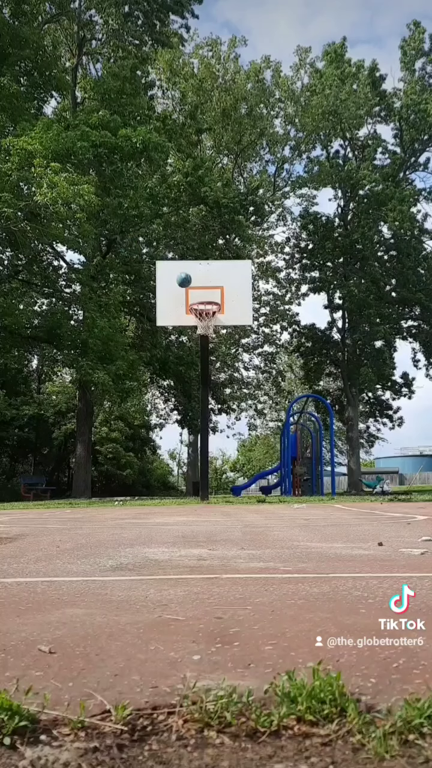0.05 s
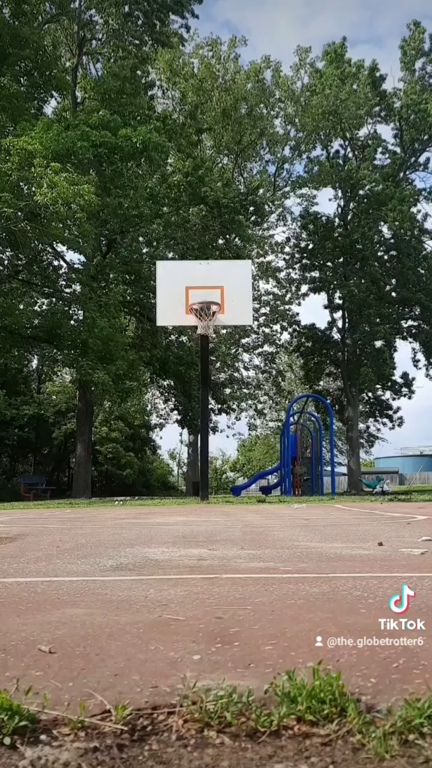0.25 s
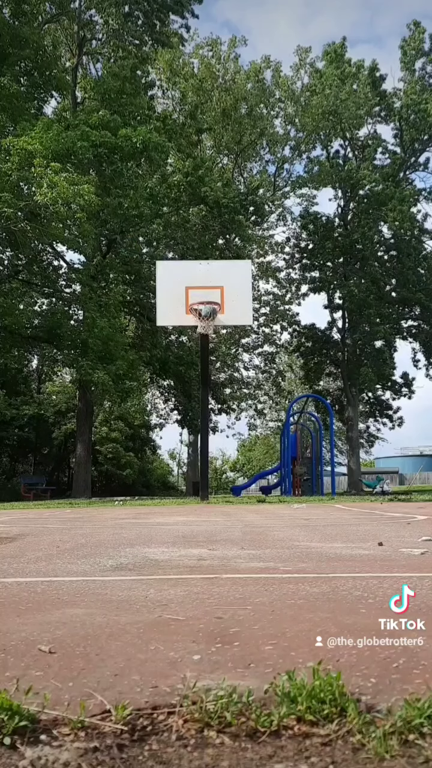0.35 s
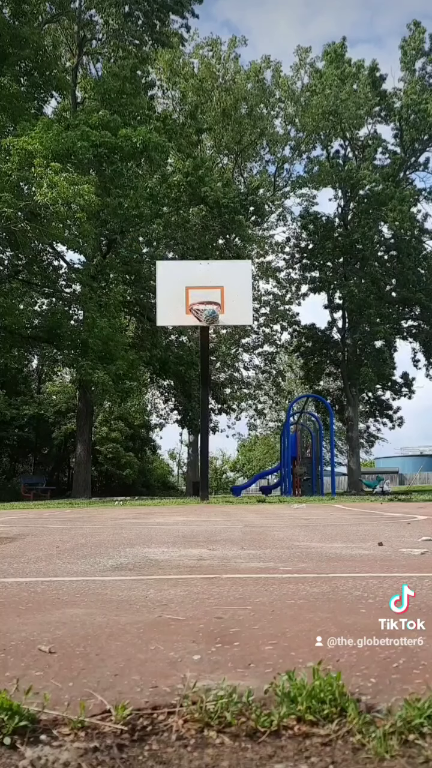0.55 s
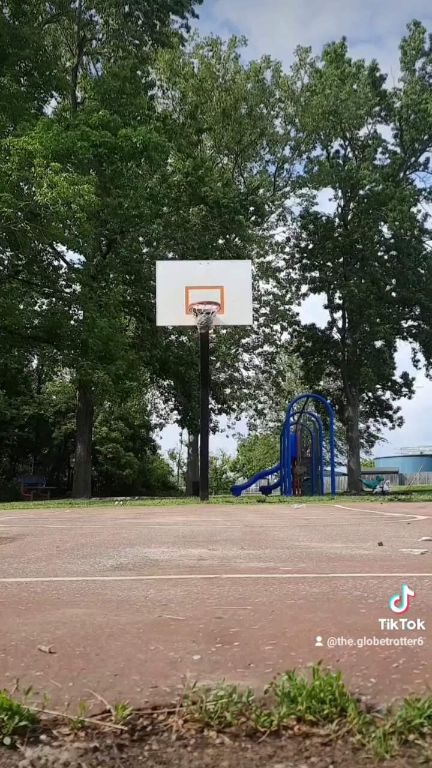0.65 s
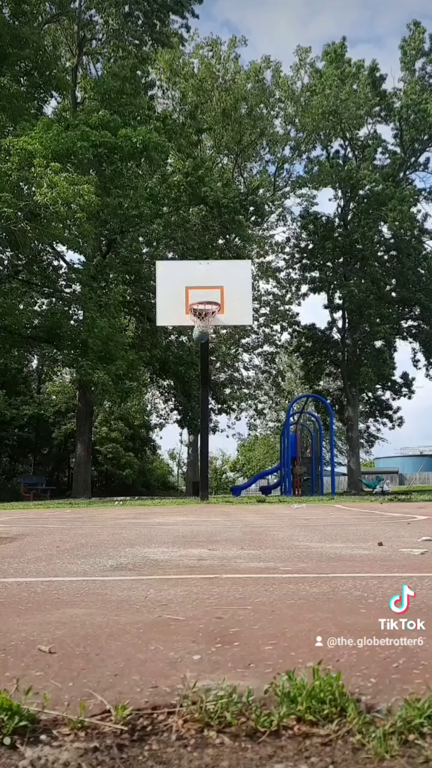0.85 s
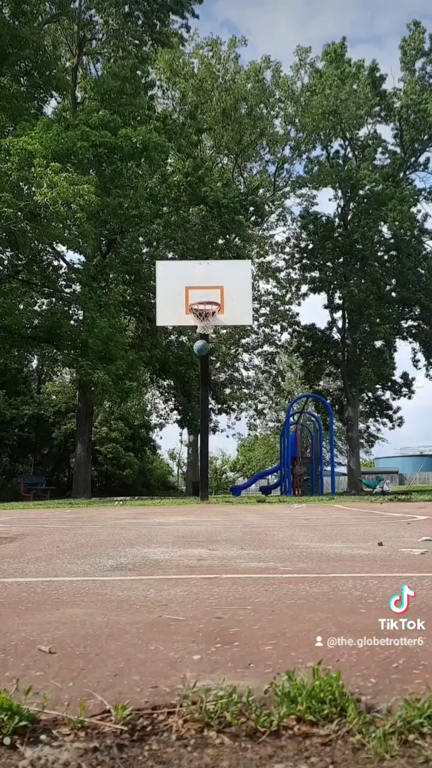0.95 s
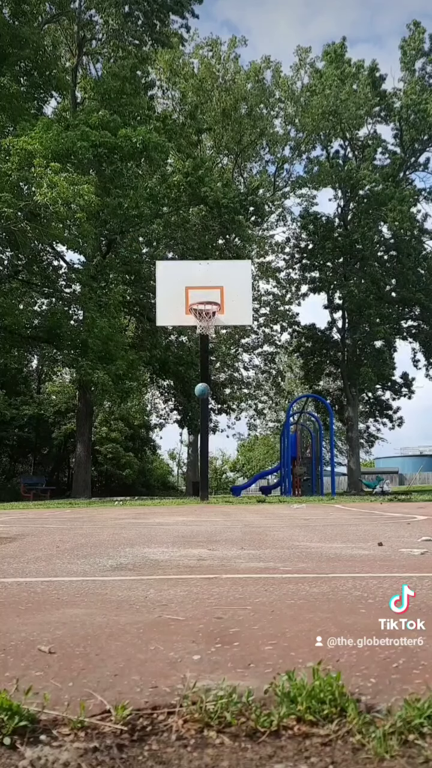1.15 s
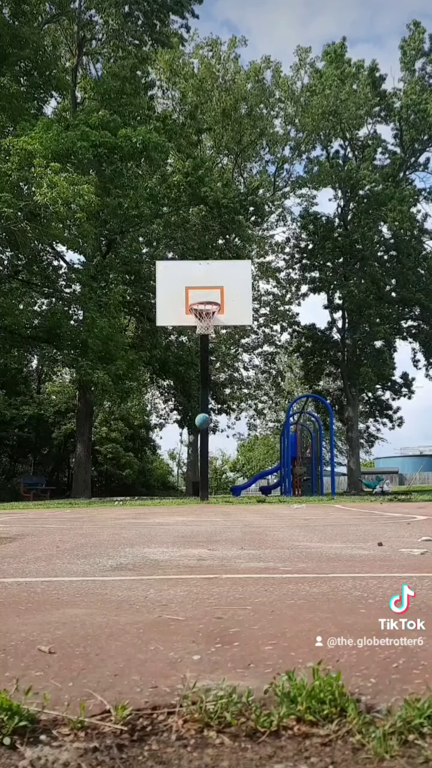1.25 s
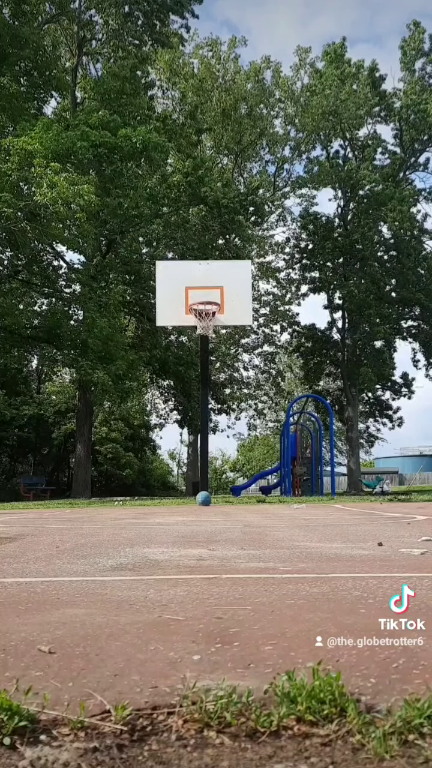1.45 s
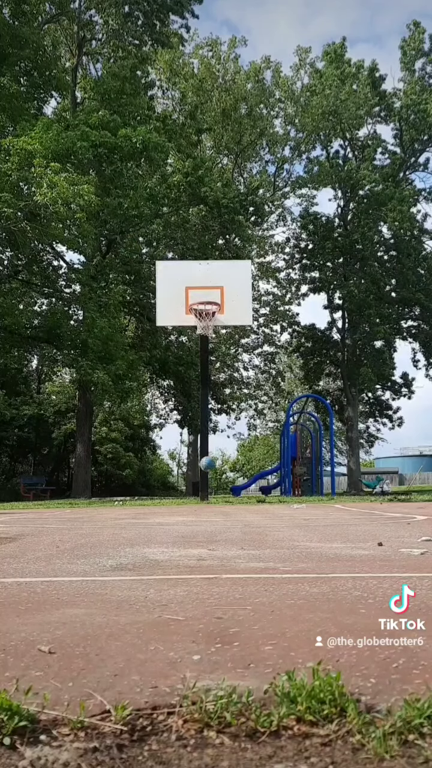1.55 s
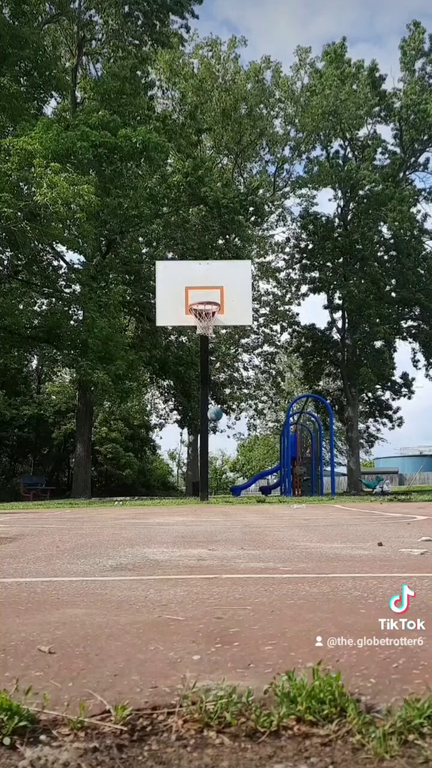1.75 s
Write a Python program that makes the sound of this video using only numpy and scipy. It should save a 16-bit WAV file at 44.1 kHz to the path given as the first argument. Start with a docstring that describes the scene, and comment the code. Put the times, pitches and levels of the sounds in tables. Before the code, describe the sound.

A basketball knocks quickly against the rim and backboard with a hollow thump and steel clank. The hoop hums and buzzes as it fades, then the ball bounces once on the asphalt of a quiet outdoor court.

```python
"""A basketball knocks on the backboard and rim of an outdoor hoop, slips through the net and bounces once.
Each knock is a hollow thump and ping from the ball, with a crack and a steel clank from the hoop.
Board and pole hum on in beating pairs of modes while loose fittings buzz. The bounce is a gritty
slap on asphalt. The trees behind scatter each hit back, and faint birds call over the hush of the park."""
import sys
import numpy as np
from scipy import signal
from scipy.fft import rfft, irfft
from scipy.io import wavfile
from scipy.ndimage import uniform_filter1d

SR = 44100
rng = np.random.default_rng(int(sys.argv[2]) if len(sys.argv) > 2 else 0)


def wav_out(sig):
    """Save sig, one row per channel (or a flat mono array), as 16-bit PCM at SR to the path in sys.argv[1]."""
    wavfile.write(sys.argv[1], SR, np.round(np.clip(np.atleast_2d(sig).T, -1, 1) * 32767).astype(np.int16))


N = 79380
T = np.arange(N) / SR
HZ = np.fft.rfftfreq(N, 1 / SR)


def ball(thump_db, ping_db):
    """The ball squashes with a low thump; its shell and the air inside ping."""
    # shell and cavity modes (frequency [Hz], level [dB], t60 [s])
    ping_modes = [(281, -31.5, 0.078), (439.6, -37, 0.13), (636, -47, 0.076), (1066, -39, 0.07),
                  (1135, -29.5, 0.04), (1298, -42, 0.092), (1364, -30, 0.048), (2196, -41, 0.033)]
    thump_hz, peak_s = 129.8, 0.0073
    squash = (T / peak_s * np.exp(1 - T / peak_s)) ** 2.8
    thump = squash * np.sin(2 * np.pi * thump_hz * T)
    ping = sum(mode(*row) for row in ping_modes)
    return amp(thump_db - 20) * thump - amp(ping_db) * ping


def hoop():
    """Each knock sounds the ball, rings board and pole, clanks the steel rim and cracks."""
    # knocks (time [s], thump [dB], ping [dB], ring [dB], clank [dB], crack [dB], crack tilt [dB/octave])
    knocks = [(.2253, -7.5, -7.5, -14, 0, -4, 0.44), (.2880, -2.5, 1.5, 1.5, -9, 0.5, 0.26),
              (0.3592, -19.5, -12.5, -21, -16, -10, 0.5)]
    # steel rim modes (frequency [Hz], level [dB], t60 [s], left minus right [dB])
    rim_modes = [(1379, -37, .06, 12), (2026, -43, 0.049, 8.5), (2336, -54, 0.044, 10),
                 (2860, -40.5, .03, 2.5), (2913, -43.5, 0.055, 4.5), (3670, -52, 0.03, 9.5),
                 (4270, -51, .025, -1.5), (5694, -46, 0.026, -7), (6400, -45.5, .03, -10.5),
                 (7870, -63.5, 0.0307, -2)]
    clank = sum(mode(hz, db, t60) * pan(side_db) for hz, db, t60, side_db in rim_modes)
    out = np.zeros((2, N))
    for s, thump_db, ping_db, ring_db, clank_db, crack_db, tilt in knocks:
        attack = amp(clank_db) * clank + amp(crack_db - 5) * crack(tilt)
        add(out, s, ball(thump_db, ping_db) + attack + amp(ring_db) * board_and_pole())
    return out


def crack(tilt):
    """The hard edge of a knock: a fast burst of dense modes, brightened by tilt dB per octave."""
    # crack spectrum (frequency [Hz], level [dB])
    colour = [(60, 6), (200, 12.5), (450, 5), (660, 9.5), (840, -10.5), (1080, 9), (1400, 1.5),
              (1650, -16.5), (2200, -19), (4000, -10.5), (5300, -20.5), (6300, -10), (7300, -24),
              (8100, -17), (9500, -35), (12000, -22), (16000, -39.5)]
    # its decay (frequency [Hz], t60 [s])
    decay = [(100, .1), (600, 0.081), (2000, 0.052), (12000, .07)]
    rise_s, release_s, release_db = 0.00069, 0.0079, -2
    contact = np.minimum(T / rise_s, 1) * amp(release_db * np.minimum(T / release_s, 1) ** 4)
    tilted = [(hz, db + tilt * np.log2(hz / 1000)) for hz, db in colour]
    return unit(contact * burst(tilted, decay))


def board_and_pole():
    """Close pairs of modes beat in a long hum, and loose fittings buzz along."""
    # mode pairs (frequency [Hz], level [dB], t60 [s], twin's offset [Hz], twin's gain [ratio])
    # a negative twin makes the pair swell in
    pairs = [(74.1, -47, 8.4, 3.724, 0.45), (104.4, -40.5, 2.6, 2.5, .15), (161.3, -33, 1.895, 11, -0.5),
             (166.95, -23.5, 0.53, 5.6, -0.59), (185.4, -44, 2.65, 14, -0.56),
             (212.1, -35, 1.42, 8.2, -0.66), (227.8, -49, 1.95, 14, -0.26), (273, -48.5, 1.2, 9, -0.7),
             (323.8, -47, 1.97, 4.86, -1.1), (545.4, -51.5, 1.12, 16, 0.4), (625, -49.5, 0.24, 11, 0.9)]
    # spectrum of the fittings (frequency [Hz], level [dB])
    buzz_colour = [(50, -12.5), (130, -2.5), (230, 2), (350, 2), (450, -9), (620, -3), (850, -10.5),
                   (1200, -7), (1450, -16), (1700, -20.5), (2800, -26), (5000, -34.5), (8000, -36.5),
                   (10000, -49.5), (15000, -44.5)]
    # their decay (frequency [Hz], t60 [s])
    buzz_decay = [(100, 4.6), (300, 1.37), (600, 1.23), (1200, 1.04), (8000, 0.69)]
    buzz_db, buzz_rise_s = -5.5, 0.036
    hum = sum(mode(hz, db, t60) + twin * mode(hz + beat, db, t60) for hz, db, t60, beat, twin in pairs)
    buzz = burst(buzz_colour, buzz_decay) * np.minimum(T / buzz_rise_s, 1)
    return hum + amp(buzz_db) * buzz


def court():
    """The ball slaps the asphalt and crunches grit as it lands, flattens and lifts off."""
    # stages of the bounce (time after contact [s], slap [dB], grit [dB])
    stages = [(0, -16, -16.5), (.0065, -54, -12.5), (0.0122, -26.5, -21)]
    # slap on asphalt (frequency [Hz], level [dB])
    slap_colour = [(80, -1), (500, -1.5), (800, -4), (1200, 8.5), (2100, -2), (3000, -3), (5000, -6),
                   (6200, -1.5), (9000, -16.5), (13000, -28), (16000, -33)]
    # crunching grit (frequency [Hz], level [dB])
    grit_colour = [(200, 15), (1300, 6), (2800, -3), (4500, -7.5), (6200, -1.5), (9500, -18), (13000, -20),
                   (16000, -36)]
    # stereo placement of the bounce (frequency [Hz], left minus right [dB])
    placement = [(200, 0), (700, 1), (1300, 4.5), (2500, -2), (6000, 1)]
    bounce_s, grit_t60 = 1.5165, .045
    out = np.zeros((2, N))
    add(out, bounce_s, ball(thump_db=-4, ping_db=-3))
    for delay, slap_db, grit_db in stages:
        grit = unit(noise(grit_colour) * amp(-60 * T / grit_t60))
        add(out, bounce_s + delay, -amp(slap_db) * click(slap_colour))
        add(out, bounce_s + delay, amp(grit_db) * grit)
    return irfft(rfft(out) * pan(read(placement, HZ)), N)


def net():
    """Soft swishes as the ball brushes hoop and net."""
    # brushes (time [s], length [s], level [dB])
    brushes = [(0.163, 0.029, -64), (0.443, 0.068, -61.5), (0.534, 0.034, -65)]
    # swish spectrum (frequency [Hz], level [dB])
    colour = [(300, -6), (1200, 8), (2600, 4), (5000, -9.5), (8000, -10), (10000, -20), (16000, -24.5)]
    return swells(brushes, colour)


def trees(send):
    """A late, soft echo scattered by trunks and leaves."""
    # echo spectrum (frequency [Hz], level [dB])
    colour = [(60, -18.5), (150, -4), (400, -5), (1200, -14), (2500, 1), (5000, 5.5), (8000, 1),
              (15000, 8.5)]
    # its decay (frequency [Hz], t60 [s])
    decay = [(100, 0.9), (1000, 1), (5000, 0.93), (14000, 0.6)]
    predelay_s, rise_s = 0.025, 0.038
    tail = unit(burst(colour, decay) * np.clip((T - predelay_s) / rise_s, 0, 1))
    return signal.fftconvolve(send, tail, axes=1)[:, :N]


def birds():
    """Two harsh notes and a rising whistle, far off."""
    # harsh notes (time [s], length [s], level [dB])
    rasps = [(.815, .085, -69), (0.886, 0.087, -68.5)]
    # their spectrum (frequency [Hz], level [dB])
    rasp_colour = [(2000, -33), (3500, -13), (4400, -5), (4850, -3.5), (5300, -18), (6200, -10),
                   (7500, -30), (12000, -32)]
    whistle_s, length_s, whistle_db = 1.122, .19, -70
    from_hz, to_hz, glide_s = 3150, 4170, .026
    pitch = to_hz + (from_hz - to_hz) * np.exp(-T / glide_s)
    envelope = np.sin(np.pi * np.minimum(T / length_s, 1) ** .5) ** 2
    out = swells(rasps, rasp_colour)
    add(out, whistle_s, amp(whistle_db) * envelope * np.sin(2 * np.pi * np.cumsum(pitch) / SR))
    return out


def hush():
    """A nearly steady bed of distant rumble and leaves."""
    # park ambience (frequency [Hz], level [dB])
    colour = [(10, -36.5), (45, -0.5), (85, 5), (140, -4), (220, -10), (300, -6), (450, -17.5), (620, -14),
              (800, -16), (1350, -16.5), (1700, -22), (2800, -21.5), (3400, -26.5), (5000, -31.5),
              (7800, -34), (9500, -49), (12500, -30), (16000, -75)]
    level_db, drift_db = -59.5, 0.05
    bands = signal.stft(noise(colour), nperseg=1024)[2]
    patches = uniform_filter1d(rng.standard_normal(bands.shape[1:]), size=12, axis=0)  # across pitch
    patches = uniform_filter1d(patches, size=8, axis=1)  # across time
    drift = amp(drift_db * patches / patches.std())
    return amp(level_db) * signal.istft(bands * drift, nperseg=1024)[1][:, :N]


def amp(db):
    """Decibels to gain."""
    return 10 ** (np.asarray(db) / 20)


def pan(side_db):
    """Left and right gains, side_db apart."""
    return amp(side_db * np.array([[.5], [-.5]]))


def read(points, hz):
    """A table's value on a log-frequency axis."""
    f, value = np.transpose(points)
    return np.interp(np.log(hz + 1), np.log(f + 1), value)


def unit(x):
    """Scales to a mean energy of one per channel."""
    return x / np.sqrt(np.mean(np.sum(x ** 2, -1)) + 1e-20)


def add(mix, s, sound):
    """Mixes a sound in at time s."""
    part = mix[:, max(round(s * SR), 0):][:, :sound.shape[-1]]
    part += sound[..., :part.shape[1]]


def mode(hz, db, t60):
    """One dying resonance."""
    return amp(db - 60 * T / t60) * np.sin(2 * np.pi * hz * T)


def noise(colour):
    """Coloured stereo noise of rms one, centred in the bass and wide in the treble."""
    # likeness of left and right (frequency [Hz], correlation before clipping to +-1 [ratio])
    likeness = [(100, 0.8), (600, 2.6), (1300, 0.09), (2500, 0), (6000, -1.6)]
    left, spread = rfft(rng.standard_normal((2, N)))
    shared = np.clip(read(likeness, HZ), -1, 1)
    right = shared * left + np.sqrt(1 - shared ** 2) * spread
    return unit(irfft(np.array([left, right]) * amp(read(colour, HZ)), N)) * np.sqrt(N)


def burst(colour, decay):
    """Dense modes that start at once and die band by band."""
    hz, t, bands = signal.stft(noise(colour), SR, nperseg=256)
    fade = amp(-60 * t / read(decay, hz)[:, None])
    return unit(signal.istft(bands * fade, SR, nperseg=256)[1][:, :N])


def click(colour):
    """One minimum-phase pulse of the given colour."""
    log_gain = np.log(amp(read(colour, abs(np.fft.fftfreq(2048, 1 / SR)))))
    spectrum = np.exp(np.conj(signal.hilbert(log_gain)))
    return unit(np.fft.ifft(spectrum).real)


def swells(events, colour):
    """Noise that rises and falls once for each event."""
    out = np.zeros((2, N))
    for s, length, db in events:
        add(out, s, amp(db) * noise(colour) * np.sin(np.pi * np.minimum(T / length, 1)))
    return out


def scene():
    """Shot, bounce and birds, each with its own send to the tree echo, over the hush."""
    shot, bounce, calls = hoop() + net(), court(), birds()
    echo = trees(amp(-11.5) * shot + amp(-4) * bounce + amp(-14) * calls)
    return shot + bounce + calls + echo + hush()


def record(dry):
    """A microphone pair, each side with its own colour and the left a touch late; low and high cut."""
    # balance of the pair (frequency [Hz], left minus right [dB])
    balance = [(100, 1.27), (600, 3), (1300, 1.5), (2500, 4), (4000, 3), (6500, -5), (13000, -3.5)]
    left_lag_s, low_cut_hz, high_cut_hz = .00008, 51, 15800
    lag = np.exp(-2j * np.pi * HZ * np.array([[left_lag_s], [0]]))
    sides = irfft(rfft(dry) * pan(read(balance, HZ)) * lag, N)
    low_cut = signal.butter(2, low_cut_hz, "highpass", fs=SR, output="sos")
    high_cut = signal.firwin(511, high_cut_hz, window=("kaiser", 9), fs=SR)
    return signal.oaconvolve(signal.sosfilt(low_cut, sides), high_cut[None], "same")


dry = scene()
out = record(dry)
wav_out(out)
```